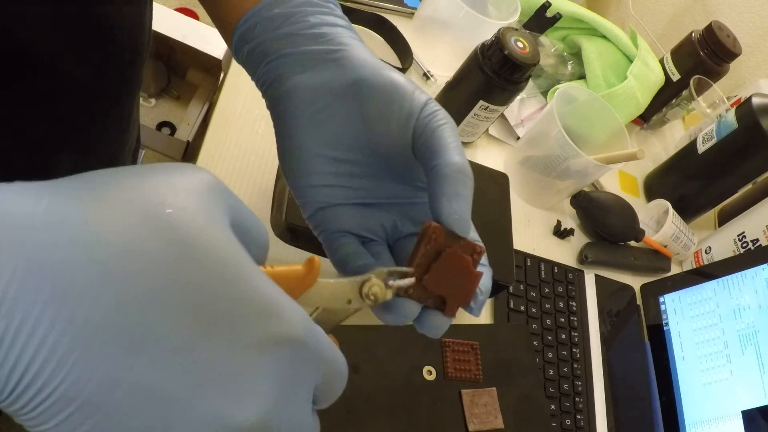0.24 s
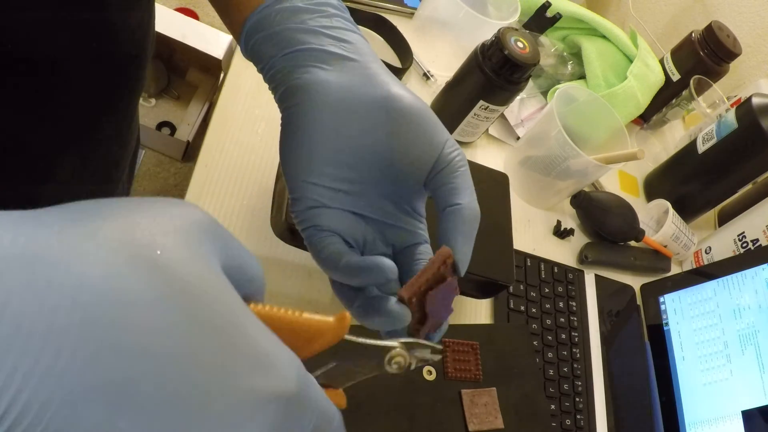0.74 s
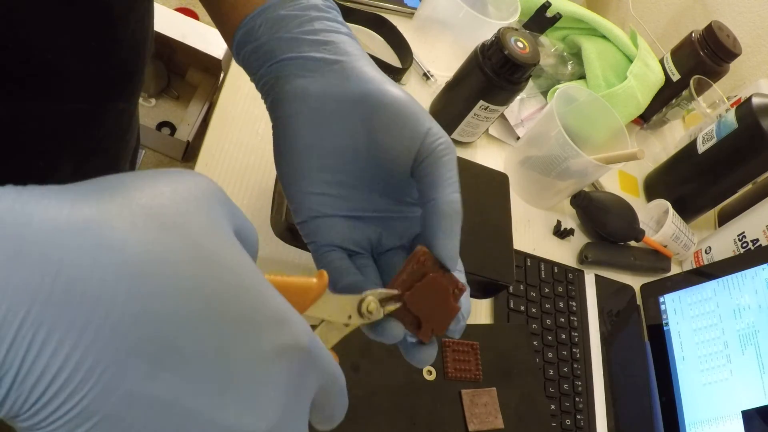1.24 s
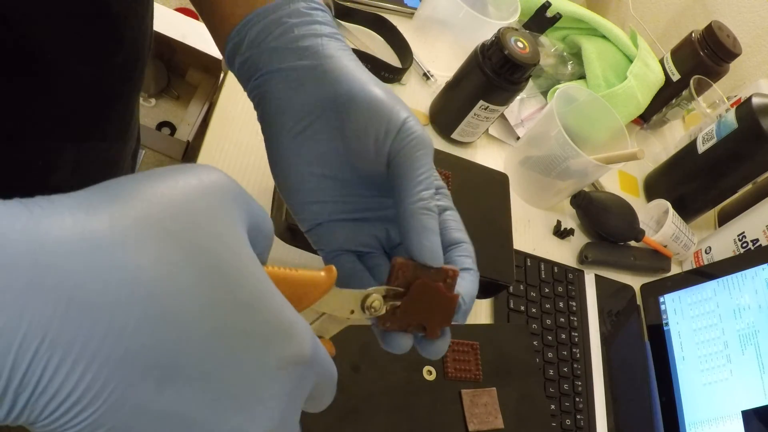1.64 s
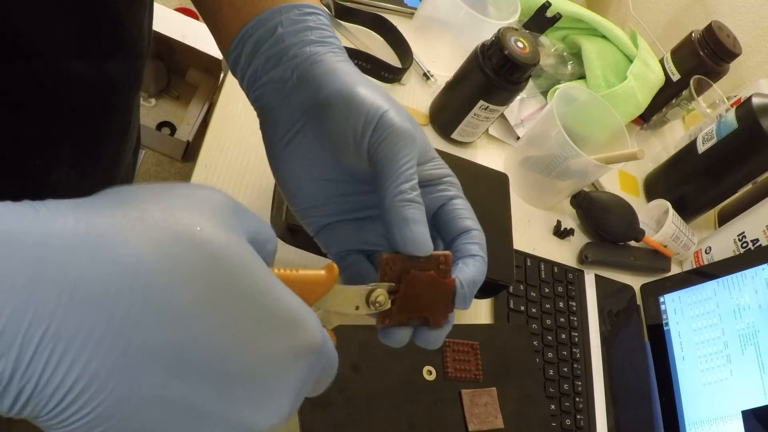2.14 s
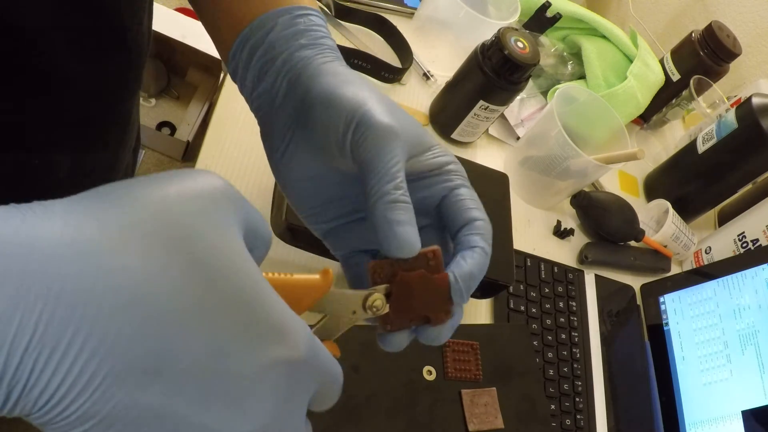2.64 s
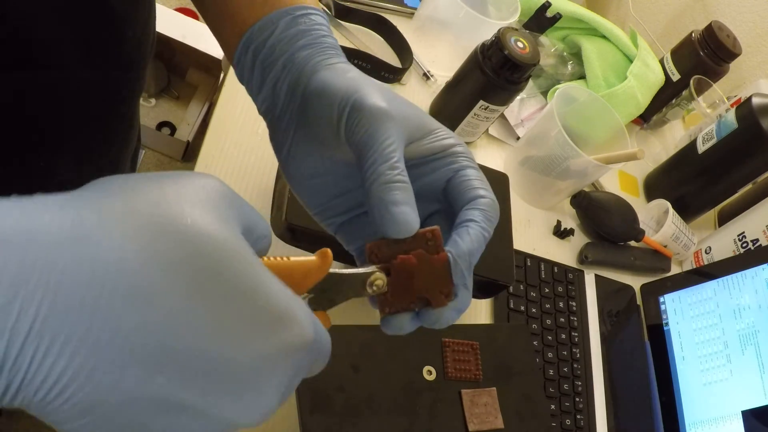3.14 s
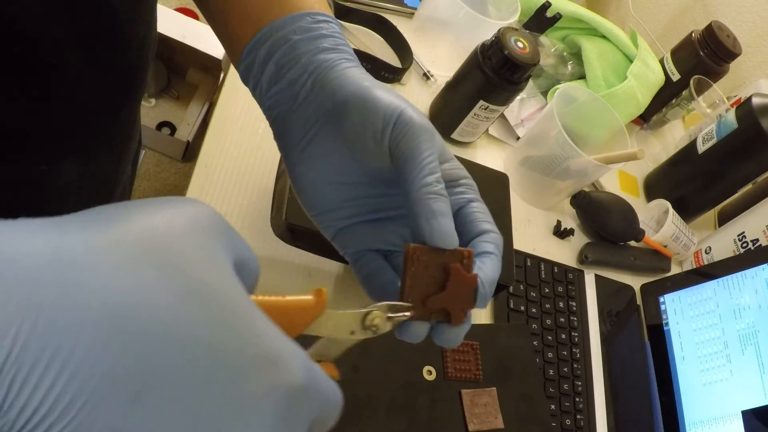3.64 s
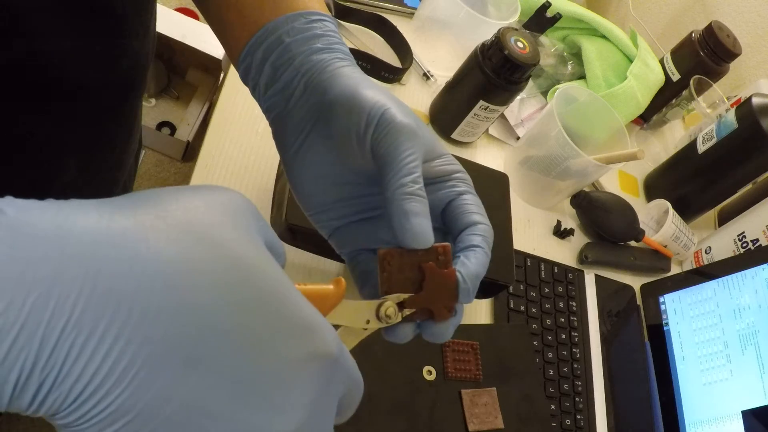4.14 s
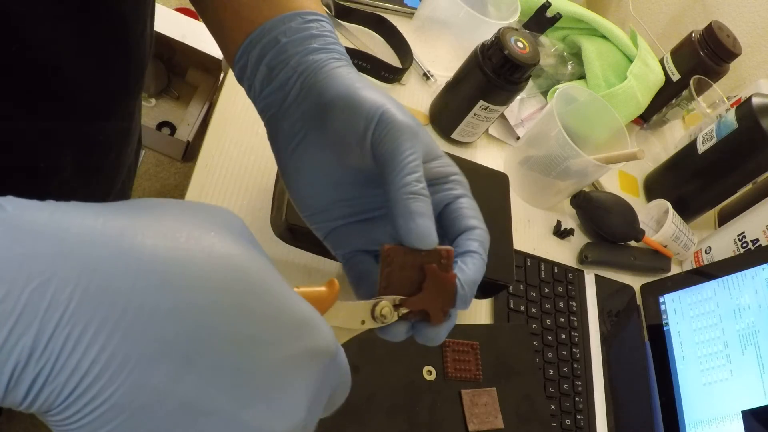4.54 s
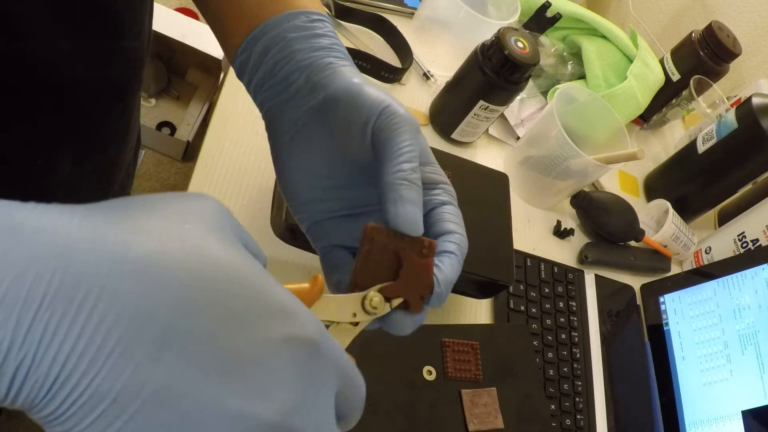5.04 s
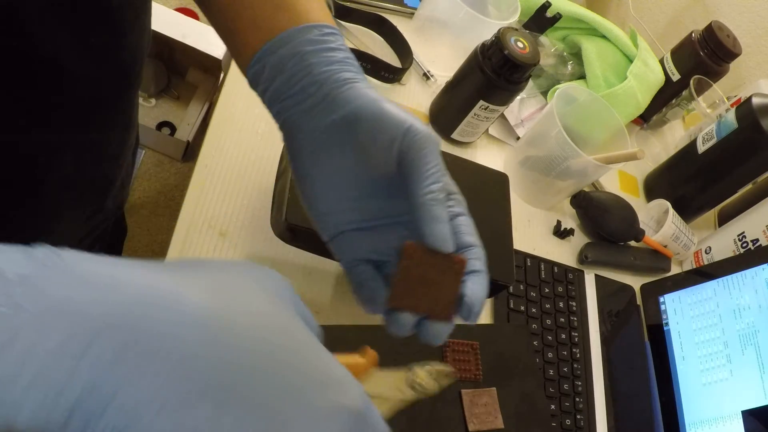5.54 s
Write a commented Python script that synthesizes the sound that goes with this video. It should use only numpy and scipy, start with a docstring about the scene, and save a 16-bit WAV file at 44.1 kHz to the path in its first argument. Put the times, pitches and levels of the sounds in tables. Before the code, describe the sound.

A small room with a close microphone: a steady low machine hum, a faint thin whine, deep soft rumble, air wash and light hiss run throughout. For almost two seconds little else is heard, until a very faint scrape and tick at about 1.8-1.9 s. At 2.2 s three brittle plastic snaps crack in quick succession, followed by tiny ticks near 2.5 and 2.7 s. Around 3.0-3.1 s come two lighter snaps with a short rasp, then stronger ones at 3.3 and 3.4 s. At 3.7 s the snips spring open with a loud, damped metallic knock, rattling lightly until 3.95 s, with ticks to 4.0 s. The hardest double crack, with a jaw click, hits at 4.4 s. A weak snap at 4.8 s, scraping at 4.9 s, a lighter snap at 5.2 s and small clicks follow; a final loud tool knock lands at 5.75 s. Short room reflections trail each impact.

```python
"""A desk in a small room, microphone close by: hand snips cut hard resin supports off a printed part.
Each support cracks as a very short resonant pulse with weaker splinters; the blades tick and, in
many tiny slips of noise, scrape. The tool knocks as it springs open, ringing damped modes; the jaws click.
Desk and walls answer with single echoes and a scattered, decaying tail. Behind lie a machine's hum and
thin whine, built from sines, and a low rumble, air wash and microphone hiss, all coloured noise."""
import sys
import numpy as np
from scipy import signal
from scipy.fft import rfft, irfft
from scipy.io import wavfile

SR = 44100
rng = np.random.default_rng(int(sys.argv[2]) if len(sys.argv) > 2 else 0)


def persist_wave(psi):
    """Save psi, clipped to +-1, as 16-bit WAV."""
    counts = np.round(np.clip(psi, -1, 1) * 32767).astype(np.int16)
    wavfile.write(sys.argv[1], SR, np.atleast_2d(counts).T)


N = 256220  # length in samples
BINS = np.fft.rfftfreq(2048, 1 / SR)  # frequency grid of the short pulses, Hz

# Background
# the machine's hum: [multiple of HUM_HZ, rms level/dB]
HUM_PARTIALS = [(1, -51), (2, -61.5), (3, -73), (5, -74), (6, -77)]
# sudden phase slips of the hum: [t/s, slip/cycles]
HUM_HICCUPS = [(0.603, .48), (3.37, 0.18), (3.465, -0.2), (4.041, .25), (4.504, 0.21)]
# machine resonances that lift the buzz into a thin whine: [f/Hz, width/Hz, peak rms level/dB]
WHINE_RESONANCES = [(5650, 100, -84), (7560, 190, -74), (10980, 220, -82), (11720, 420, -80.5),
                    (12960, 220, -82.5), (13740, 260, -82), (15140, 100, -89)]
# spectrum of the room's low rumble: [f/Hz, relative level/dB]
RUMBLE_SPECTRUM = [(12, -20.5), (28, -3.5), (38, -10.5), (47, 2), (57, -3.5), (68, 2), (80, -19),
                   (100, -13), (150, -18), (200, -30), (300, -56)]
# spectrum of the air moving through the room: [f/Hz, relative level/dB]
AIR_SPECTRUM = [(100, -6.5), (180, 1.5), (330, 1.5), (450, -3), (650, -3), (900, -3.5), (1400, -8.5),
                (2000, -12.5), (2800, -21), (5000, -39)]
# spectrum of the steady microphone hiss: [f/Hz, relative level/dB]
HISS_SPECTRUM = [(2000, 0.5), (4500, 0), (7000, -4), (10000, -6.5), (15000, -9)]
HUM_HZ, MAINS_HZ, MAINS_DB = 256.68, 120, -57
BUZZ_DB, BUZZ_DB_PER_OCTAVE = -83, -6  # the hum's higher multiples, fading with pitch
RUMBLE_DB, AIR_DB, HISS_DB = -50, -60.5, -67
AIR_DB_PER_S = -0.28  # the air flow eases slowly
EDGE_HZ = 15450  # upper band limit

# Place
# first reflections off the desk and nearby things: [delay/s, level/dB]
NEAR_ECHOES = [(.00075, -26.5), (.00365, -18.5), (0.0103, -30.5), (0.0118, -26)]
# the room's decay: [f/Hz, t60/s]
ROOM_DECAY = [(300, 1), (2000, 0.24), (3500, 0.32), (5000, 0.28), (9000, 0.24), (15000, 0.28)]
# reflections start at the desk and swell again when the walls answer
DESK_S, DESK_FADE_S, DESK_DB = 0.00069, 0.0054, 9.5
WALL_S, WALL_SPREAD_S, WALL_DB = 0.022, 0.004, 4

# Hand and snips
# the snips springing open and rattling in the hand:
# [t/s, level/dB, grip as a factor on the mode frequencies, dull blow level/dB]
KNOCK_EVENTS = [(3.6990, 16, 1.013, -3), (3.821, -6, 1.07, 5), (3.887, -16, 1.45, -6),
                (3.9096, -12, 1.26, 0), (3.9473, -9, 1.2, -4), (5.7491, 17, 1.06, -1)]
# modes of the snips, broad for the held handles, faint and sharp for the steel: [f/Hz, width/Hz, level/dB]
TOOL_MODES = [(1720, 49, -9), (1790, 93, 4.5), (2138, 230, -1), (2453, 380, -6.5), (2920, 200, -5),
              (3300, 210, -11), (3650, 150, -9), (4730, 106, -13), (5470, 79, -21), (6060, 200, -17),
              (1660, 18, -4), (1850, 27, -12), (2140, 26, -8)]
# spectrum of the dull click of a blow: [f/Hz, level/dB]
BLOW_SPECTRUM = [(120, -31.5), (500, -24), (900, -17), (2000, -16), (4000, -25), (7000, -25.5),
                 (11000, -33), (15000, -41.5)]
# spectrum of the hand taking up a knock: [f/Hz, relative level/dB]
THUD_SPECTRUM = [(120, -10), (260, 0), (520, 2), (800, -3), (1150, -1), (1700, -9), (3200, -8), (6000, -16),
                 (14000, -26)]
# jaws clicking together: [t/s, level/dB, pitch as a factor on the ring frequencies]
JAW_EVENTS = [(3.3687, -31, .9), (3.413, -21, .8), (4.4216, 11.5, 1.05), (5.1951, -15.5, 1),
              (5.2059, -15.5, 1.07), (5.2936, -24, 0.72), (5.454, -19.5, 1.18)]
# ring of the closed jaws: [f/Hz, width/Hz, level/dB]
JAW_MODES = [(4930, 850, 1.5), (6450, 1800, 0)]
# every knock rebounds once, weaker and stiffer
REBOUND_S, REBOUND_DB, REBOUND_GRIP, REBOUND_BLOW_DB = 0.0024, -11, 1.18, 4.5
THUD_DB, THUD_DB_PER_KNOCK_DB, THUD_FADE_S = -49, 0.22, 0.013

# Blades and resin
# blade sliding on resin: [t/s, length/s, level/dB]
SCRAPE_STROKES = [(1.859, 0.041, -70), (3.068, 0.05, -60), (4.925, 0.075, -59.5)]
# spectrum of the sliding rasp: [f/Hz, relative level/dB]
RASP_SPECTRUM = [(800, -10), (2000, 10), (4000, 3), (6000, 6.5), (7500, -1), (10000, 8), (11500, 1),
                 (13000, -18)]
# blades nicking the resin: [t/s, level/dB, f/Hz, ring of the part/dB]
TICK_EVENTS = [(1.8901, -38.5, 6000, 12.5), (2.4792, -25.5, 9700, -3.5), (2.6841, -27, 8260, -10),
               (2.702, -34.5, 6000, 11), (3.9097, -28, 12540, 1), (3.948, -28, 4600, 1),
               (3.9783, -25, 12500, 1.5), (4.0168, -25.5, 12800, -1), (4.7390, -30, 3200, 11.5),
               (4.742, -27, 9000, 3.5), (4.8101, -27, 7500, -9), (4.877, -33.5, 5500, 11),
               (5.3523, -38, 3000, 11)]
# spells of faint stray ticks while the blades feel for a support: [start t/s, end t/s]
PROBING_SPELLS = [(1.76, 1.81), (3.06, 3.12), (3.96, 4.0), (4.83, 5.14)]
# supports cracking: [t/s, level/dB, f/Hz, width/Hz, ring of the part/dB, treble edge f/Hz, room level/dB]
SNAP_EVENTS = [(2.2048, 5.5, 7900, 2900, -14.5, 16000, -12), (2.2481, 4, 8000, 3600, -19.5, 16000, -11.5),
               (2.2533, 6, 9200, 2000, -21, 15000, -11.5), (2.9986, -7, 8790, 3400, -9, 16500, -11),
               (3.1021, -5.5, 8400, 2600, -9.5, 9900, -11), (3.2728, 5, 9620, 2300, -18.5, 15000, -13),
               (3.392, 10.5, 9000, 3000, -17, 12300, -12.5), (4.4178, 9.5, 9980, 5000, 1.5, 13500, -10),
               (4.4212, 16, 10620, 2410, -7.5, 13520, -12), (4.7716, -17.5, 4300, 3500, 7.5, 12000, -3.5),
               (5.1906, -7, 10600, 1800, -3.5, 11970, -5.5)]
# spectrum of the printed part's ring: [f/Hz, level/dB]
PART_SPECTRUM = [(200, -26), (1200, -24.5), (1600, -9.5), (2200, 3), (2780, -3.5), (3350, 2), (4200, -12.5),
                 (5200, -7), (9000, -27.5), (16000, -30.5)]
TICK_WIDTH_HZ = 3500
STRAY_PER_S, STRAY_DB, STRAY_SPREAD_DB, STRAY_RING_DB = 15, -35, 5, -4
STRAY_LOW_HZ, STRAY_HIGH_HZ = 6000, 10500
# thin overtone of every pillar; it stands out more in light snaps
OVERTONE_HZ, OVERTONE_WIDTH_HZ = 14500, 1300
OVERTONE_DB, OVERTONE_DB_PER_SNAP_DB = -15.5, -0.6
PART_LAG_S = 0.0003  # the jolt reaches the body of the part a moment after the break
SPLINTER_S, SPLINTER_DB = 0.0012, -14.5  # longest delay and level of the weaker cracks


def amp(db):
    """Decibels to gain."""
    return 10 ** (np.asarray(db) / 20)


def unit(x):
    """Scales to rms 1."""
    return x / np.sqrt(np.mean(x ** 2) + 1e-20)


def read(points, hz):
    """Reads a table on a log-frequency axis."""
    f, value = np.transpose(points)
    return np.interp(np.log(hz + 1), np.log(f + 1), value)


def add(mix, s, sound):
    """Mixes a sound in at time s, cut at the end of the mix."""
    part = mix[round(s * SR):][:len(sound)]
    part += sound[:len(part)]


def coloured(x, points):
    """Gives x a spectrum, at rms 1."""
    gain = amp(read(points, np.fft.rfftfreq(len(x), 1 / SR)))
    return unit(irfft(rfft(x) * gain, len(x)))


def drift(hz):
    """Slow random wander, rms 1, fading out above the rate hz."""
    knots = np.linspace(0, N / SR, num=512)
    rates = np.fft.rfftfreq(len(knots), knots[1])
    wander = irfft(rfft(rng.standard_normal(len(knots))) * np.exp(-(rates / hz) ** 2))
    return unit(np.interp(np.arange(N) / SR, knots, wander))


def resonance(hz, width):
    """Gain of one resonance over frequency, 1 at its top."""
    return 1 / np.hypot(1, (BINS ** 2 - hz ** 2) / (width * (BINS + 1)))


def pulse(gain):
    """The minimum-phase pulse: the shortest causal one that has this spectrum."""
    log_gain = np.log(np.maximum(gain, 1e-6))
    circle = np.concatenate([log_gain, log_gain[-2:0:-1]])
    return np.fft.ifft(np.exp(np.conj(signal.hilbert(circle)))).real


def air(swell_db=0.9):
    """Ventilation gives a lumpy rumble and a soft wash; the microphone adds a smooth hiss."""
    rumble = amp(RUMBLE_DB + swell_db * drift(2.78)) * coloured(rng.standard_normal(N), RUMBLE_SPECTRUM)
    flow_db = AIR_DB_PER_S * (np.arange(N) - N / 2) / SR
    wash = amp(AIR_DB + flow_db) * coloured(rng.standard_normal(N), AIR_SPECTRUM)
    hiss = amp(HISS_DB) * coloured(rng.standard_normal(N), HISS_SPECTRUM)
    return rumble + wash + hiss


def overtones():
    """The hum's high multiples and their dB: a falling buzz, lifted where the machine resonates."""
    k = np.arange(HUM_PARTIALS[-1][0] + 1, EDGE_HZ // HUM_HZ)
    buzz = amp(BUZZ_DB + BUZZ_DB_PER_OCTAVE * np.log2(k / k[0]))
    whine = sum(amp(db) * np.exp(-((k * HUM_HZ - hz) / width) ** 2) for hz, width, db in WHINE_RESONANCES)
    return list(zip(k, 20 * np.log10(np.hypot(buzz, whine))))


def hum(waver_db=0.4, mains_waver_db=0.2, hiccup_s=0.0047):
    """Harmonics of one slightly unsteady rotation make buzz and whine, beside a wavering mains hum."""
    t = np.arange(N) / SR
    slip = sum(cycles * np.clip((t - s) / hiccup_s, 0, 1) for s, cycles in HUM_HICCUPS)
    turns = HUM_HZ * t + slip + 0.0022 * drift(2)
    partials = HUM_PARTIALS + overtones()
    buzz = sum(amp(db) * np.sin(2 * np.pi * (k * turns + rng.random())) for k, db in partials)
    mains_turns = MAINS_HZ * t + 0.03 * drift(5.5)
    mains = amp(MAINS_DB + mains_waver_db * drift(6)) * np.sin(2 * np.pi * mains_turns)
    return np.sqrt(2) * (buzz * amp(waver_db * drift(2.71)) + mains)  # peak from rms


def room(x, reflections_per_s=9000):
    """Scattered reflections off desk and walls, each band dying at its own speed."""
    n = SR // 2
    taps = rng.choice([-1., 1.], n) * (rng.random(n) < reflections_per_s / SR)
    hz, t, bands = signal.stft(taps, SR, nperseg=256)
    decay = amp(-60 * t / read(ROOM_DECAY, hz)[:, None])
    tail = signal.istft(bands * decay, SR, nperseg=256)[1][:n]
    age = np.arange(n) / SR
    desk_db = DESK_DB * np.exp(-age / DESK_FADE_S)
    wall_db = WALL_DB * np.exp(-((age - WALL_S) / WALL_SPREAD_S) ** 2)
    tail *= (age > DESK_S) * amp(desk_db + wall_db)
    return signal.fftconvolve(x, tail / np.linalg.norm(tail))[:N]


def echoes(x):
    """The direct sound and its first reflections, each a delayed, weaker copy."""
    out = x.copy()
    for delay, db in NEAR_ECHOES:
        add(out, delay, amp(db) * x)
    return out


def thuds():
    """Dull, grainy give of the hand under each knock; it grows less than the knock does."""
    t, level = np.arange(SR // 6) / SR, np.zeros(N)
    for s, level_db, _, _ in KNOCK_EVENTS:
        thud_db = THUD_DB + THUD_DB_PER_KNOCK_DB * level_db
        add(level, s, amp(thud_db) * np.exp(-t / THUD_FADE_S))
    return level * coloured(rng.standard_normal(N), THUD_SPECTRUM)


def knocks(contact_hz=7000, travel_s=0.00037, chatter_s=0.0025, chatter=1.0, radiate_hz=1350):
    """A chattering blow, and the modes of the snips, damped and shifted by the grip of the hand."""
    t, out = np.arange(SR // 6) / SR, np.zeros(N)
    hz, width, db = np.transpose(TOOL_MODES)[:, :, None]
    travel = travel_s * np.sqrt(hz[0] / hz)  # low bending waves reach the handles last
    decays = (t >= travel) * amp(db) * 2 * np.pi * width / SR * np.exp(-np.pi * width * t)
    blow = pulse(amp(read(BLOW_SPECTRUM, BINS)))
    # a small tool radiates little bass, a soft contact little treble
    softness = signal.butter(2, [radiate_hz, contact_hz], "bandpass", fs=SR)
    rebounds = [(s + REBOUND_S, level_db + REBOUND_DB, grip * REBOUND_GRIP, blow_db + REBOUND_BLOW_DB)
                for s, level_db, grip, blow_db in KNOCK_EVENTS]
    for s, level_db, grip, blow_db in KNOCK_EVENTS + rebounds:
        modes = decays * np.cos(2 * np.pi * hz * grip * (t - travel))
        ring = signal.lfilter(*softness, modes.sum(0))
        contacts = rng.standard_normal(len(t)) * np.exp(-t / chatter_s)
        contacts *= chatter / np.linalg.norm(contacts)
        contacts[0] += 0.5  # extra weight on the first touch
        add(ring, 0, amp(blow_db) * signal.fftconvolve(contacts, blow))
        add(out, s, -amp(level_db) * ring)
    return out


def jaws(small_hz=3800, edge_hz=10000):
    """Steel meets steel with a short, bright ring."""
    out = np.zeros(N)
    band = 1 / np.hypot(1, (small_hz / (BINS + 1)) ** 4) / np.hypot(1, (BINS / edge_hz) ** 4)
    for s, level_db, pitch in JAW_EVENTS:
        ring = np.sqrt(sum((amp(db) * resonance(hz * pitch, width)) ** 2 for hz, width, db in JAW_MODES))
        add(out, s, amp(level_db) * pulse(band * ring))
    return out


def scrapes(slips_per_s=700):
    """Many tiny slips of uneven size under each stroke."""
    t = np.arange(N) / SR
    slips = rng.standard_normal(N) * (rng.random(N) < slips_per_s / SR)
    strokes = np.zeros(N)
    for s, length, db in SCRAPE_STROKES:
        corners = [s, s + 0.1 * length, s + 0.9 * length, s + length]
        strokes += amp(db) * np.interp(t, corners, [0, 1, 1, 0])
    return strokes * coloured(slips, RASP_SPECTRUM)


def stray_ticks():
    """Faint ticks at uneven intervals while the blades feel their way."""
    slots = [s for start, end in PROBING_SPELLS for s in np.arange(start, end, 1 / STRAY_PER_S)]
    return [(s + late / STRAY_PER_S, STRAY_DB + STRAY_SPREAD_DB * (2 * force - 1),
             STRAY_LOW_HZ + (STRAY_HIGH_HZ - STRAY_LOW_HZ) * pitch, STRAY_RING_DB)
            for s, (late, force, pitch) in zip(slots, rng.random(size=(64, 3)))]


def crack(db, hz, width, ring_db, edge_hz, overtone_db, small_hz=3900):
    """A thin pillar rings for a few cycles and jolts the part that it stands on."""
    small = 1 / np.hypot(1, (small_hz / (BINS + 1)) ** 4)  # a small thing radiates little bass
    blunt = 1 / np.hypot(1, (BINS / edge_hz) ** 10)  # a slower break lacks the top treble
    overtone = amp(overtone_db) * resonance(OVERTONE_HZ, OVERTONE_WIDTH_HZ)
    sound = pulse(small * np.hypot(blunt * resonance(hz, width), overtone))
    part_ring = pulse(blunt * amp(read(PART_SPECTRUM, BINS)))
    add(sound, PART_LAG_S, amp(ring_db) * part_ring)
    return amp(db) * sound


def splintered(sound, splinters):
    """The main break, then weaker cracks of either sign at uneven moments."""
    out = sound.copy()
    for late, side in splinters:
        add(out, SPLINTER_S * late, np.sign(side - 0.5) * amp(SPLINTER_DB) * sound)
    return out


def cuts(tick_room_db=-9, shaded_db=-1, scatter=1.07, tick_edge=1.3, tick_overtone_db=-16):
    """Snaps and ticks, near and as sent into the room, which gathers a broader colour from all sides."""
    near, far = np.zeros((2, N))
    snaps = [(*row, OVERTONE_DB + OVERTONE_DB_PER_SNAP_DB * row[1]) for row in SNAP_EVENTS]
    ticks = [(s, db, hz, TICK_WIDTH_HZ, ring_db, hz + tick_edge * TICK_WIDTH_HZ, tick_room_db, tick_overtone_db)
             for s, db, hz, ring_db in TICK_EVENTS + stray_ticks()]
    chance = rng.random(size=(64, 3, 2))  # three splinters each: delay and sign
    for event, splinters in zip(snaps + ticks, chance):
        s, db, hz, width, ring_db, edge_hz, room_db, overtone_db = event
        direct = crack(db, hz, width, ring_db, edge_hz, overtone_db)
        add(near, s, splintered(direct, splinters))
        around = crack(db + room_db, hz, width * scatter, ring_db + shaded_db, edge_hz * scatter, overtone_db)
        add(far, s, around)
    return near, far


def scene(knock_room_db=-5.0, scrape_room_db=-8, jaw_room_db=-6):
    """The work close up at the desk, its room and the background."""
    background = hum() + air()
    near, far = cuts()
    knock, scrape, jaw = knocks(), scrapes(), jaws()
    to_room = far + amp(knock_room_db) * knock + amp(scrape_room_db) * scrape + amp(jaw_room_db) * jaw
    close = echoes(near + knock + scrape + jaw)
    return (close + room(to_room) + thuds() + background)[None]


def record(dry):
    """The microphone input clips at full scale; then a low-pass sets the band limit."""
    clipped = np.clip(dry, -1, 1)
    low_pass = signal.firwin(255, EDGE_HZ, window=("kaiser", 8), fs=SR)
    return signal.oaconvolve(clipped, low_pass[None], "same")


dry = scene()
out = record(dry)
persist_wave(out)
```